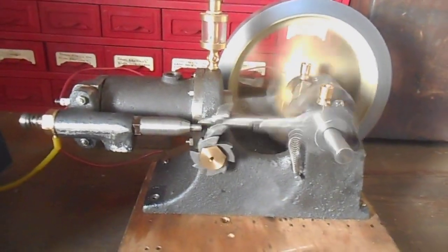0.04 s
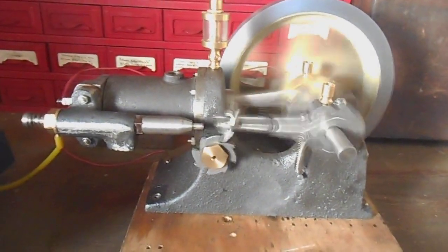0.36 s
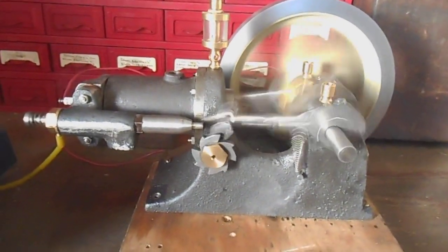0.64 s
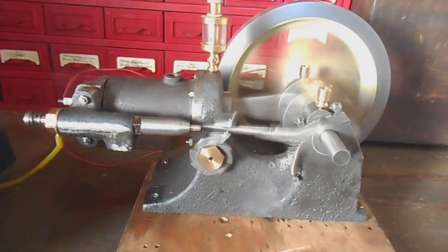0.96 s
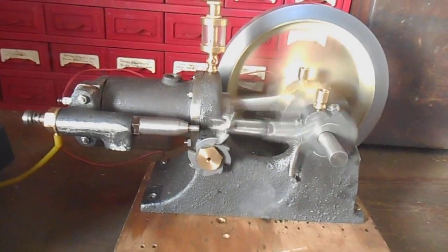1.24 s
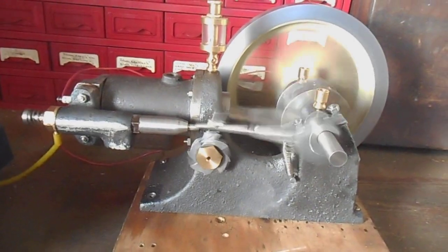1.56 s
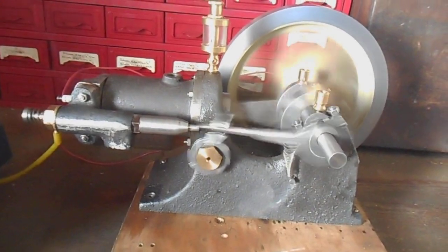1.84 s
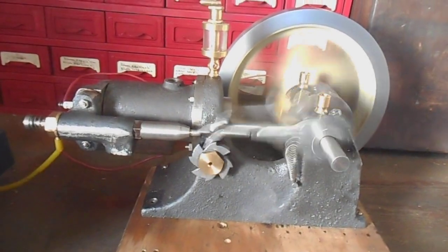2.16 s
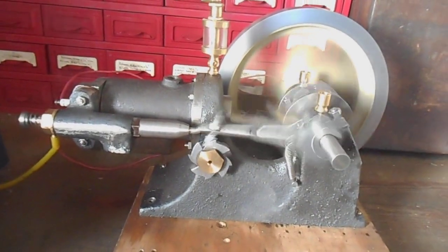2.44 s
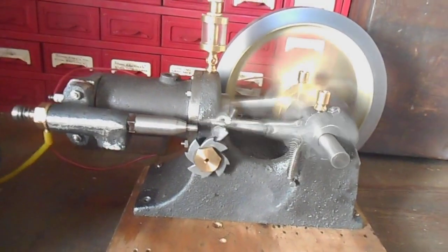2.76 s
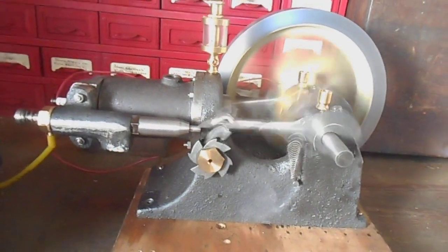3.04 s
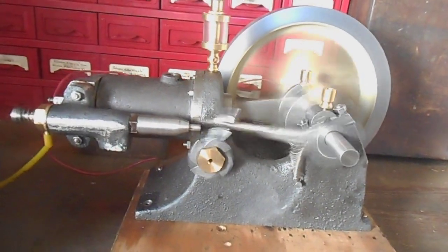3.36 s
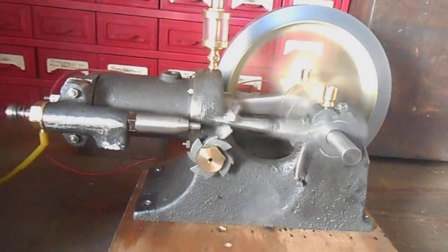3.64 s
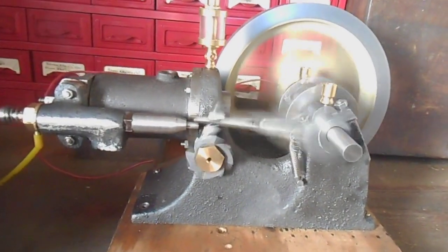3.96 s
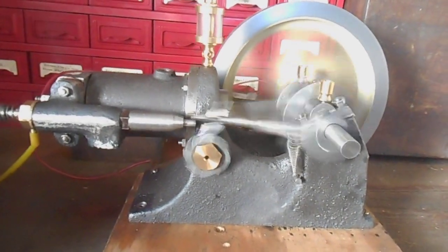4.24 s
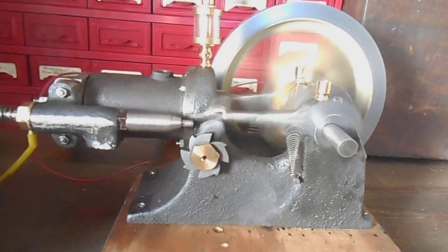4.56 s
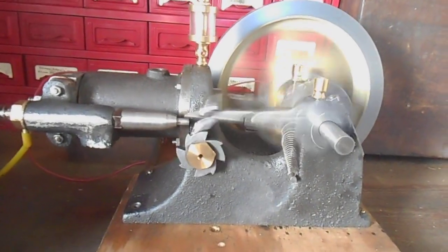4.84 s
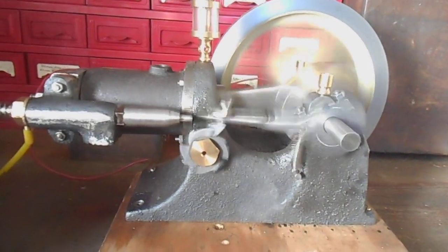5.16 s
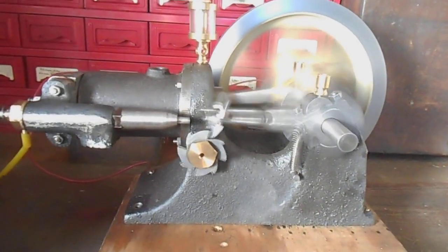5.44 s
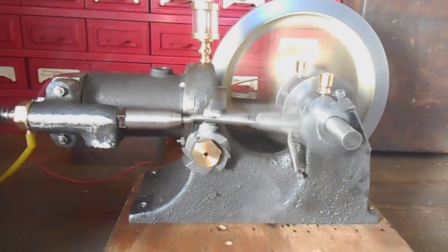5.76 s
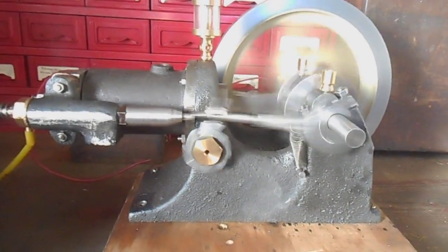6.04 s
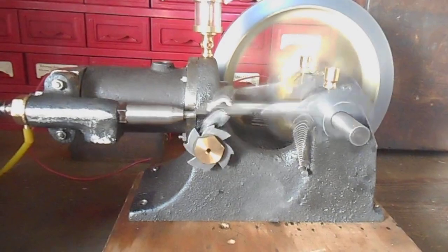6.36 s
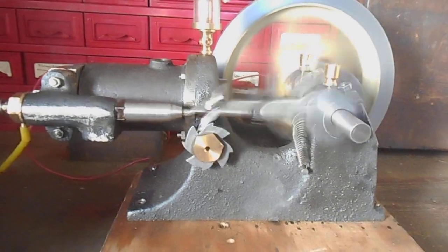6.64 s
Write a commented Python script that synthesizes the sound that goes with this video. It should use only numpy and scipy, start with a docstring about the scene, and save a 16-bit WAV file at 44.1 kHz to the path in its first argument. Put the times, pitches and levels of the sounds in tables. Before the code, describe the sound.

A small model engine is already running at the start and keeps going until the end, at about 6.7 seconds. It turns roughly seven times a second, making a fast, regular mechanical clatter. On every turn a pawl strikes a ratchet wheel with bright clicks, the valve gives a short hollow chuff, a steel rod knocks with a brief metallic ring, and the pawl drops back with lighter ticks. Every fourth chuff is weaker, giving the rhythm a slight lilt. Dull bearing bumps and faint spring pings sit between the blows, and the metal body and wooden base resonate a little. The speed barely changes, though the rod's ring becomes slightly higher between about 3 and 4 seconds. A soft, steady hiss of sliding parts and a barely audible low hum lie beneath. The engine sounds close, with modest workshop reverberation.

```python
"""A small model engine runs on a wooden board in a workshop, at about seven turns a second.
On each turn a pawl strikes the ratchet wheel and clatters it on by one tooth, the valve chuffs hollowly
(weaker on every fourth turn), the rod knocks as its load reverses, and the pawl drops back. The impacts
excite the normal modes of casting, board and steel parts; a bearing bumps and a spring pings faintly.
The room reverberates, and beneath it all lie the hiss of sliding friction and a low hum."""
import sys
import numpy as np
from scipy import signal
from scipy.fft import rfft, irfft
from scipy.io import wavfile

SR = 44100
rng = np.random.default_rng(int(sys.argv[2]) if len(sys.argv) > 2 else 0)


def persist_wave(psi):
    """Save psi, clipped to +-1, as 16-bit WAV."""
    counts = np.round(np.clip(psi, -1, 1) * 32767).astype(np.int16)
    wavfile.write(sys.argv[1], SR, np.atleast_2d(counts).T)


N = 295911

# speed of the flywheel: t/s, speed/rpm
FLYWHEEL_SPEED = [(0.0, 401.9), (0.9, 410.7), (2.1, 413.2), (2.7, 413.0), (3.0, 415.1), (3.6, 412.9),
                  (4.5, 415.9), (5.4, 417.9), (6.0, 417.0), (6.7, 413.0)]
# spectrum of sliding friction: f/Hz, relative level/dB
FRICTION_SPECTRUM = [(30, -12), (70, -55), (150, -18), (400, -2), (750, 8.5), (1400, 3.5), (2500, 3),
                     (3100, -3.5), (3700, 8), (4300, -2.5), (7000, -5), (10000, -18), (15000, -13)]
# contacts of the pushing pawl: t/s from the knock, level/dB, timing scatter/s, level scatter/dB
PUSH_CONTACTS = [(-.0318, -24.5, 0.00033, 10), (-.0281, 0.5, 0.00027, 0.97), (-.0203, -5, .0012, 3.5),
                 (-.0159, -2.5, 0.0008, 0.5)]


def from_db(db):
    return 10 ** (np.asarray(db) / 20)


def at_hz(points, hz):
    """Interpolate (f/Hz, value) points on a logarithmic frequency axis."""
    points = np.array(points)
    return np.interp(np.log(np.maximum(hz, 1)), np.log(points[:, 0]), points[:, 1])


def at_time(points, s):
    """Interpolate (t/s, value) points linearly."""
    return np.interp(s, *np.transpose(points))


def fade(t, t60):
    """Exponential decay: the amplitude falls 60 dB in t60 seconds."""
    return np.exp(-np.log(1000) * t / t60)


def unit_energy(x):
    return x / np.sqrt(np.sum(x ** 2, axis=-1, keepdims=True))


def add(out, s, sound):
    """Superposition: mix a sound in at time s."""
    start = int(round(s * SR))
    if 0 <= start < N:
        out[start:start + len(sound)] += sound[:N - start]


def play(shape, limit=1.5):
    """Bounded scatter: the play in the joints limits how far a contact strays in time or strength."""
    return limit * np.tanh(rng.standard_normal(shape) / limit)


def colour(x, spectrum, size=4096):
    """Minimum-phase filtering: a causal response with the given (f/Hz, gain/dB) curve."""
    cepstrum = irfft(np.log(from_db(at_hz(spectrum, np.fft.rfftfreq(size, 1 / SR)))))
    cepstrum[1:size // 2] *= 2
    cepstrum[size // 2 + 1:] = 0
    return signal.fftconvolve(x, irfft(np.exp(rfft(cepstrum))))[:N]


def ring(clicks, hz, t60):
    """Damped oscillator: each impulse sets one mode ringing, which radiates little far below its pitch."""
    r, w = fade(1 / SR, t60), 2 * np.pi * hz / SR
    return signal.lfilter([.5, 0, -.5], [1, -2 * r * np.cos(w), r * r], clicks + 1e-18)


def swelling_ring(times, levels_db, hz, swell_s, detune, size=4096):
    """Softly driven resonance: each tone grows for swell_s and decays, at a slightly different pitch."""
    t, out = np.arange(size) / SR, np.zeros(N)
    envelope = (t / swell_s * np.exp(1 - t / swell_s)) ** 2
    for s, db, chance in zip(times, levels_db, rng.standard_normal(len(times))):
        add(out, s, from_db(db) * envelope * np.sin(2 * np.pi * hz * (1 + detune * chance) * t))
    return out


def flywheel(first_knock_s=.0523):
    """Phase is the integral of speed: turns made at each sample, and the time of each whole turn."""
    t = np.arange(N) / SR
    turn = np.cumsum(at_time(FLYWHEEL_SPEED, t)) / (60 * SR)
    turn -= np.interp(first_knock_s, t, turn)
    whole = np.arange(int(turn[-1]) + 2)
    beyond = np.maximum(whole - turn[-1], 0) / (turn[-1] - turn[-2])   # the last turn outlasts the sound
    return turn, (np.interp(whole, turn, np.arange(N)) + beyond) / SR


def strengths(turn_s, chuff_scatter_db=1.9, chuff_loss_db_per_rpm=0.56, usual_rpm=414):
    """Load modulates amplitude: gains in dB of push, knock, drop and chuff on each turn."""
    # effort of the engine against its load: t/s, level/dB
    effort = [(0.05, 2.9), (0.2, 4.0), (0.64, 3), (0.94, -2.7), (1.67, 1.5), (1.81, -1), (3.26, -2.2),
              (4.28, 2.4), (4.85, -3), (5.0, -0.2), (5.43, 1), (5.86, -2.5), (6.15, 1.3), (6.29, -1.1),
              (6.58, 0.3)]
    # the ratchet's four-turn load cycle, one row a turn: push/dB, knock/dB, drop/dB, chuff/dB
    load_cycle = [(-0.53, 0.1, -0.35, -5.5), (0.64, 0.5, 1.4, -0.5), (-0.45, 0.86, 0, 0.4),
                  (1.77, 0.5, -0.1, -1)]
    effort_shares = [0.67, 0.96, .45, 0.51]
    cycle_db = np.array(load_cycle)[np.arange(len(turn_s)) % len(load_cycle)]
    push_db, knock_db, drop_db, chuff_db = cycle_db.T + np.outer(effort_shares, at_time(effort, turn_s))
    # a faster turn leaves the valve less time
    chuff_db -= chuff_loss_db_per_rpm * (at_time(FLYWHEEL_SPEED, turn_s) - usual_rpm)
    chuff_db += chuff_scatter_db * rng.standard_normal(len(turn_s))
    return push_db, knock_db, drop_db, chuff_db


def rubbing(turn, level_db=-42, swing_db=1, quietest_turn=0.57):
    """Sliding friction: rod and bearings hiss, swelling slightly on each of a turn's two strokes."""
    hiss = colour(rng.standard_normal(N), FRICTION_SPECTRUM)
    stroke = -np.cos(2 * np.pi * 2 * (turn - quietest_turn))
    return hiss / hiss.std() * from_db(level_db + swing_db * stroke)


def hum(hz=70, rms_db=-71):
    """A pure tone: the faint low hum in the room."""
    return from_db(rms_db) * np.sqrt(2) * np.sin(2 * np.pi * hz * np.arange(N) / SR)


def pawl_slide(turn_s, lead_s=0.015, gain_db=-33, low_hz=1800, size=4096):
    """Friction noise: the pawl scrapes along the back of a tooth, ever harder until it strikes."""
    t, out = np.arange(size) / SR, np.zeros(N)
    envelope = (t / lead_s) * (t < lead_s)
    strike_s = turn_s + PUSH_CONTACTS[1][0]
    for s, grains in zip(strike_s, rng.laplace(0, 1, (len(turn_s), size))):
        add(out, s - lead_s, from_db(gain_db) * envelope * grains)
    highpass = signal.butter(1, low_hz, "high", fs=SR, output="sos")
    return signal.sosfilt(highpass, colour(out, FRICTION_SPECTRUM))


def casting(clicks, place, scatter_db=2.5, contact_hz=5950):
    """Modal superposition: the place struck (0 push, 1 knock, 2 drop) weights each mode."""
    # modes of casting and board, the last two broad cracks: f/Hz, t60/s, push/dB, knock/dB, drop/dB
    modes = [(172, 0.2, -80, -52, -74), (237.3, 0.24, -61, -76, -77), (297.5, 0.067, -56, -40, -66),
             (425, 0.093, -48, -46.5, -66.5), (541, 0.15, -45, -45, -74), (622, 0.031, -43, -26, -81),
             (735, 0.11, -45, -60, -37), (847.6, 0.064, -58, -31.5, -41), (955, 0.034, -63, -25.5, -59),
             (1055, 0.07, -59, -32, -42), (1092, 0.029, -56, -25, -47), (1235, 0.059, -33, -66, -47),
             (1619, 0.053, -42, -32.5, -35.5), (1768, 0.02, -64, -22.5, -39),
             (2007, 0.092, -55, -33.5, -40), (2574, 0.015, -39, -21, -71), (3750, 0.034, -39, -56, -49),
             (5652, 0.031, -24, -21.5, -46), (7120, 0.016, -14, -40, -21), (680, 0.028, -41, -32.5, -70),
             (2530, 0.0074, -34, -14.5, -54)]
    hits, out = np.flatnonzero(clicks), np.zeros(N)
    for hz, t60, db in np.array(modes)[:, [0, 1, 2 + place]]:
        force = np.zeros(N)
        force[hits] = clicks[hits] * from_db(db + scatter_db * play(len(hits)))
        out += ring(force, hz, t60)
    # a finite contact time rounds the attack
    return signal.sosfilt(signal.butter(2, contact_hz, fs=SR, output="sos"), out)


def steel_rings(count, rise_s, t60, size=4096):
    """Dense modes ring as decaying noise; the high ones vary most with the exact point of contact."""
    # part of the ring that repeats from blow to blow: f/Hz, energy share (0-1)
    repeating = [(200, 0.6), (1000, 0.43), (2500, 0.4), (8000, 0.03)]
    t = np.arange(size) / SR
    share = np.clip(at_hz(repeating, np.fft.rfftfreq(size, 1 / SR)), 0, 1)
    noise = rfft(rng.standard_normal((count + 1, size)))
    modes = irfft(np.sqrt(share) * noise[0] + np.sqrt(1 - share) * noise[1:])
    return unit_energy(modes * (1 - np.exp(-t / rise_s)) * fade(t, t60))


def blows(contacts, turn_s, turn_db, place, rise_s, t60, rebound_db):
    """Impact excitation: the strongest contact shakes the casting most, the light ones mainly tick."""
    # spectrum of the small steel parts: f/Hz, push/dB, knock/dB, drop/dB
    steel_spectra = [(40.4, -33.5, -29.5, -18), (149, -12.5, -3, -20), (444, -1.5, 6, -8),
                     (760, 12, 10, 1.5), (1180, 8.5, 6.5, 11), (1340, 1.5, 10.5, 0), (2060, 10, 10, 2.5),
                     (2570, 1, 15, 1.5), (3740, 10.5, 15, 3.5), (4970, 10.5, 14, 8.5), (6750, 6.5, 11, 5),
                     (7980, 3, 7.5, 1), (10950, -4.5, -5.5, -11), (15400, 3, 6, 1.5)]
    clicks, steel = np.zeros(N), np.zeros(N)
    strongest = np.argmax([row[1] for row in contacts])
    for k, (offset_s, level_db, scatter_s, scatter_db) in enumerate(contacts):
        late, hard = play((len(turn_s), 2)).T
        times = turn_s + offset_s + scatter_s * late
        forces = from_db(turn_db + level_db + scatter_db * hard)
        weight = 1 if k == strongest else from_db(rebound_db)
        for s, force, tick in zip(times, forces, steel_rings(len(turn_s), rise_s, t60)):
            add(clicks, s, [force * weight])
            add(steel, s, force * tick)
    return casting(clicks, place) + colour(steel, np.array(steel_spectra)[:, [0, 1 + place]])


def pawl_push(turn_s, turn_db):
    """Repeated impact: the pawl clatters against the ratchet wheel as it drives it on."""
    return blows(PUSH_CONTACTS, turn_s, turn_db, place=0, rise_s=0.00019, t60=0.045, rebound_db=-6.5)


def valve_chuff(turn_s, turn_db, lead_s=.029, level_db=-29):
    """Resonance: the valve sounds one hollow note just ahead of each knock."""
    return swelling_ring(turn_s - lead_s, turn_db + level_db, hz=738.6, swell_s=0.012, detune=0.0064)


def rod_knock(turn_s, turn_db):
    """Backlash: the rod strikes as its load reverses, then once more lightly."""
    # contacts of the rod: t/s from the whole turn, level/dB, timing scatter/s, level scatter/dB
    contacts = [(.0001, -1, 0.000029, 0.59), (.0225, -13, .0015, 3.2)]
    return blows(contacts, turn_s, turn_db, place=1, rise_s=0.00073, t60=0.057, rebound_db=-11)


def rod_pitch(turn_s, scatter_octaves=0.073):
    """Centre of excitation: the pitch the rod favours drifts upward and scatters from turn to turn."""
    # pitch at which the rod rings most strongly: t/s, f/Hz
    drift = [(0, 3150), (3, 3320), (4.1, 3960), (6.7, 4100)]
    return at_time(drift, turn_s) * 2 ** (scatter_octaves * rng.standard_normal(len(turn_s)))


def rod_clank(turn_s, turn_db, centre_hz, width_octaves=.22, chatter_s=0.0018, scatter_db=3.5):
    """Selective excitation: the loose rod lands differently each time, favouring modes near one pitch."""
    # modes of the connecting rod and crank: f/Hz, t60/s, level/dB
    modes = [(2475, 0.04, -26), (2583, 0.045, -14), (2930, 0.072, -21), (3178, 0.036, -21),
             (3445, 0.037, -20.5), (3720, 0.077, -29.5), (4160, 0.04, -27), (4380, 0.07, -22),
             (4800, 0.06, -27), (5630, 0.097, -13)]
    out = np.zeros(N)
    for hz, t60, db in modes:
        favour = 1 / (1 + (np.log2(hz / centre_hz) / width_octaves) ** 2)
        late, hard, side = play((len(turn_s), 3)).T
        forces = favour * np.sign(side) * from_db(turn_db + db + scatter_db * hard)
        clicks = np.zeros(N)
        for s, force in zip(turn_s + chatter_s * abs(late), forces):
            add(clicks, s, [force])
        out += ring(clicks, hz, t60)
    return out


def pawl_drop(turn_s, turn_db):
    """Inelastic rebound: the pawl drops back and bounces twice, losing strength."""
    # contacts of the falling pawl: t/s from the knock, level/dB, timing scatter/s, level scatter/dB
    contacts = [(.0396, -1, 0.00033, 2), (.0565, -10, .002, 2.5), (.0735, -19, 0.00087, 2.4)]
    return blows(contacts, turn_s, turn_db, place=2, rise_s=0.00042, t60=0.046, rebound_db=-1.5)


def bearing_bump(turn_s, delay_s=0.06, gain_db=0.5, scatter_s=0.00152, scatter_db=4.5, soft_hz=2180):
    """Cushioned impact: on the back stroke the oiled bearing takes up its play with a dull bump."""
    clicks = np.zeros(N)
    for s, (late, hard) in zip(turn_s, play((len(turn_s), 2))):
        add(clicks, s + delay_s + scatter_s * late, from_db([gain_db + scatter_db * hard]))
    return signal.sosfilt(signal.butter(2, soft_hz, fs=SR, output="sos"), casting(clicks, place=2))


def spring_ping(turn_s, delay_s=0.072, level_db=-46.0, scatter_db=8):
    """Resonance: the return spring pings faintly in the quiet part of the turn."""
    levels_db = level_db + scatter_db * play(len(turn_s))
    return swelling_ring(turn_s + delay_s, levels_db, hz=3870, swell_s=0.0037, detune=0.0088)


def workshop(x, build_s=0.0015, size=20000, bands=10):
    """Reverberation: diffuse reflections build up, then decay at each band's own rate."""
    # strength of the reverberation: f/Hz, level/dB
    room_levels = [(100, -13), (800, -10.5), (2500, -8.5), (6000, -13.5), (14000, -37)]
    # reverberation time: f/Hz, t60/s
    decay_times = [(100, 0.97), (900, 0.74), (3000, 0.055), (7000, 0.69), (15000, .2)]
    t, response = np.arange(size) / SR, 0
    edges_hz = np.geomspace(40, 18000, bands + 1)
    build_up = 1 - np.exp(-(t / build_s) ** 2)
    for low, high in zip(edges_hz, edges_hz[1:]):
        hz = np.sqrt(low * high)
        envelope = unit_energy(build_up * fade(t, at_hz(decay_times, hz)))
        band = signal.butter(2, [low, high], "band", fs=SR, output="sos")
        reflections = signal.sosfilt(band, envelope * rng.standard_normal(size))
        response = response + from_db(at_hz(room_levels, hz)) * reflections
    return signal.fftconvolve(x, response)[:N]


def scene():
    """Superposition: the sounds of each turn and their reverberation, over the rubbing and the hum."""
    turn, turn_s = flywheel()
    push_db, knock_db, drop_db, chuff_db = strengths(turn_s)
    rod_hz = rod_pitch(turn_s)
    push = pawl_push(turn_s, push_db) + pawl_slide(turn_s)
    knock = rod_knock(turn_s, knock_db) + rod_clank(turn_s, knock_db, rod_hz)
    drop = pawl_drop(turn_s, drop_db)
    engine = push + knock + drop + valve_chuff(turn_s, chuff_db) + bearing_bump(turn_s) + spring_ping(turn_s)
    return (engine + workshop(engine) + rubbing(turn) + hum())[None]


def record(dry, cutoff_hz=15750):
    """Filtering: a deep notch hollows the treble near 11 kHz and a steep low-pass cuts the top."""
    # treble notch: f/Hz, gain/dB
    treble_notch = [(10150, 0), (10480, -8), (10800, -23), (11080, -35), (11420, -21), (11900, 0)]
    notched = colour(dry[0], treble_notch)[None]
    return signal.sosfilt(signal.ellip(10, .2, 70, cutoff_hz, fs=SR, output="sos"), notched)


dry = scene()
out = record(dry)
persist_wave(out)
```